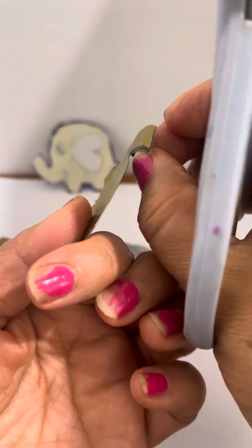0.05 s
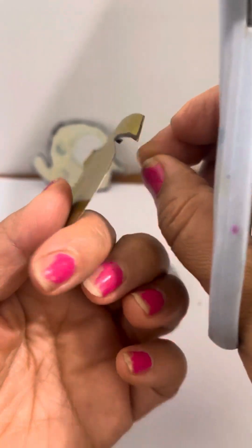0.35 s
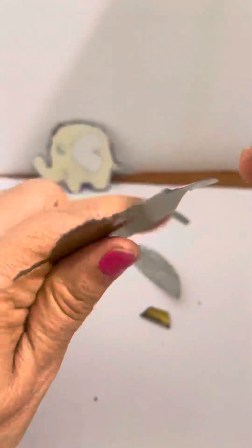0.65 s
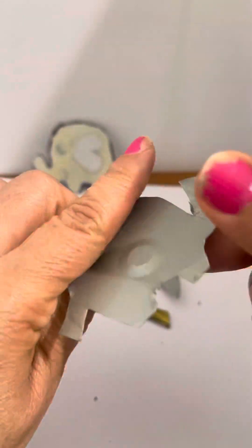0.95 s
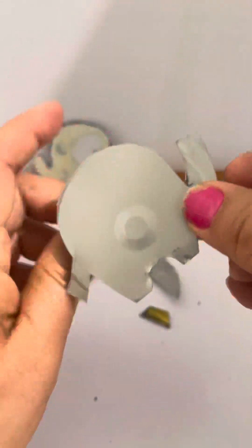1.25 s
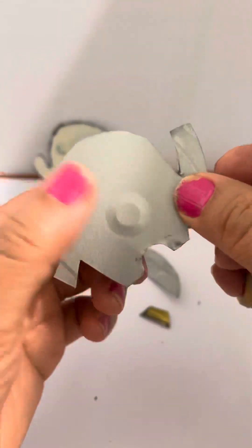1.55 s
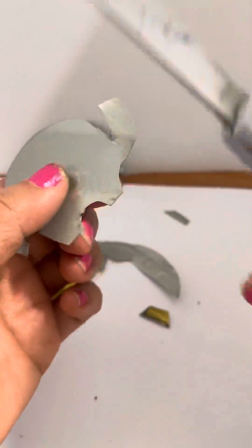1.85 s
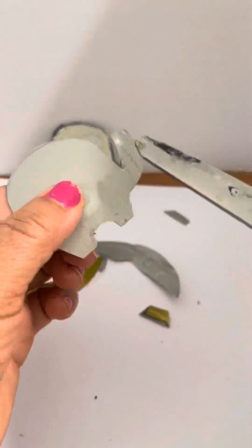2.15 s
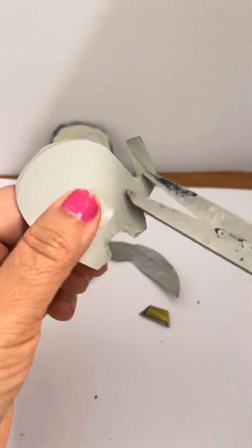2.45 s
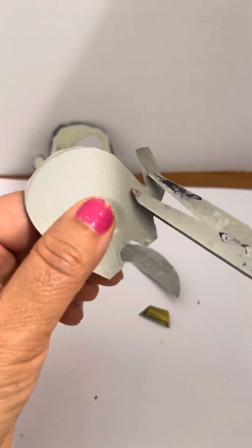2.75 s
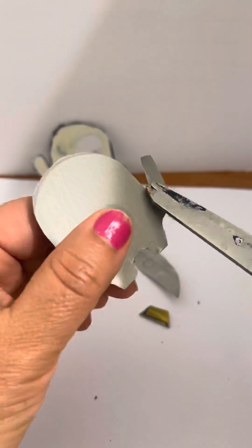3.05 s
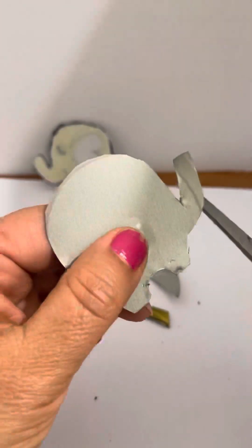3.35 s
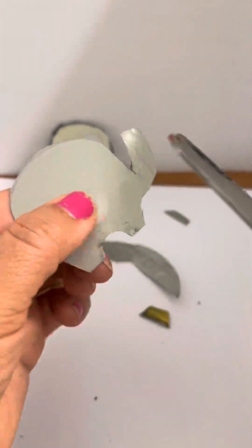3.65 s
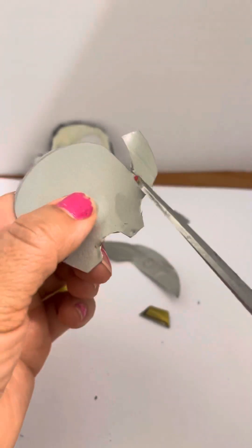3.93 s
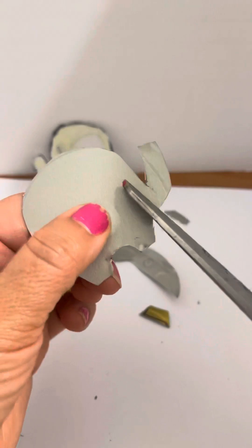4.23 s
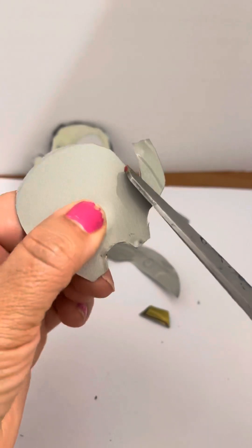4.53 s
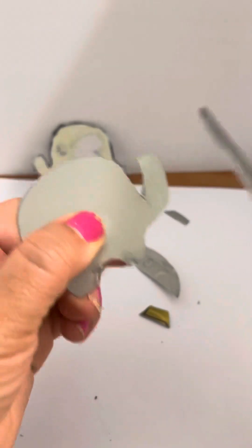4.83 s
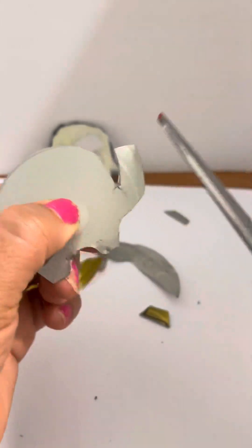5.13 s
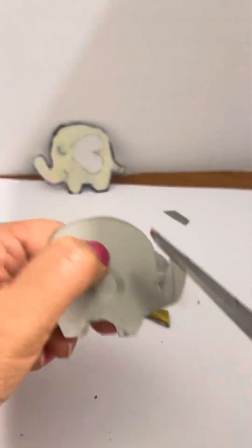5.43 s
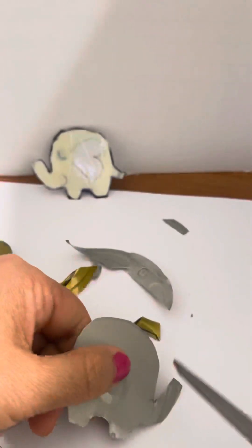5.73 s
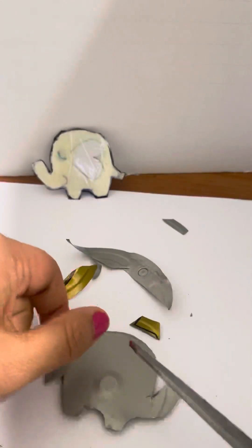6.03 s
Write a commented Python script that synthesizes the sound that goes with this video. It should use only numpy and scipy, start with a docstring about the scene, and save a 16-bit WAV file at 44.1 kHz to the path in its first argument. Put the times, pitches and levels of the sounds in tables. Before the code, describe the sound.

Scissors snip and tick against thin tin, with dull table knocks and a final ringing scrape over a low hum.

```python
"""A small room with a distant motor humming; two microphone ports sit close to the work on a table.
Scissors trim a small shape from thin tin sheet. Fingers turn, rub and buckle the tin; the blades tick
against it and shear through in short crunching snips, each a run of tiny fractures.
A nudge sets something rocking on the table with dull knocks; at the end the piece is laid down
and scrapes among the ringing scraps."""
import sys
import numpy as np
from scipy import signal
from scipy.fft import rfft, irfft, next_fast_len
from scipy.io import wavfile

SR = 44100
rng = np.random.default_rng(int(sys.argv[2]) if len(sys.argv) > 2 else 0)


def persist_wave(psi):
    """Save psi, clipped to +-1, as 16-bit WAV."""
    counts = np.round(np.clip(psi, -1, 1) * 32767).astype(np.int16)
    wavfile.write(sys.argv[1], SR, np.atleast_2d(counts).T)


N = 272538
TIME = np.arange(N) / SR


def amp(db):
    """Decibels to gain."""
    return 10 ** (np.asarray(db) / 20)


def unit(x):
    """Scales to rms 1."""
    return x / np.sqrt(np.mean(x ** 2) + 1e-20)


def read(points, hz):
    """Reads a table on a log-frequency axis."""
    freq_hz, value = np.transpose(points)
    return np.interp(np.log(hz + 1), np.log(freq_hz + 1), value)


def add(mix, start_s, sound):
    """Mixes a sound in at a time."""
    part = mix[max(round(start_s * SR), 0):][:len(sound)]
    part += sound[:len(part)]


def colour(x, spectrum, size=2048):
    """Causal filter of unit energy, shaped by rows of freq_hz, gain_db."""
    log_gain = np.log(amp(read(spectrum, abs(np.fft.fftfreq(size, 1 / SR)))))
    minimum_phase = np.exp(np.conj(signal.hilbert(log_gain)))
    taps = np.fft.ifft(minimum_phase).real[:size // 2]
    return signal.oaconvolve(x, taps / np.linalg.norm(taps))[:len(x)]


def drift(rate_hz):
    """Random wander up to a rate, rms 1."""
    rolloff = 1 + (np.fft.rfftfreq(N, 1 / SR) / rate_hz) ** 4
    return unit(irfft(rfft(rng.standard_normal(N)) / rolloff, N))


def ring(modes, size):
    """Impulse response of decaying modes with random phases."""
    t = np.arange(size) / SR
    return sum(amp(db - 60 * t / t60_s) * np.sin(2 * np.pi * (hz * t + rng.random()))
               for hz, db, t60_s in modes)


def excite(force, modes, size):
    """Drives modes with a force, through a response of unit energy."""
    response = ring(modes, size)
    return signal.oaconvolve(force, response / np.linalg.norm(response))[:len(force)]


def sheet(force, t60_s, count):
    """The irregular modes of a thin sheet, evenly dense in frequency; they change with every grip."""
    pitches_hz = 300 + (np.arange(count) + rng.random(count)) * 14000 / count
    levels_db = 2.5 * rng.standard_normal(count)
    modes = [(hz, db, t60_s) for hz, db in zip(pitches_hz, levels_db)]
    return excite(force, modes, size=round(t60_s * SR))


def grains(size, per_s, spread_db):
    """A random train of tiny clicks of uneven size, as in stick-slip."""
    strength = amp(spread_db * np.minimum(rng.exponential(1, size), 4))
    return unit(strength * rng.standard_normal(size) * (rng.random(size) < per_s / SR))


def gesture(start_s, length_s, db, attack_s, release_s, sag_db_per_s):
    """Gain of one movement: it swells, sags and dies; attack and release each span 60 dB."""
    gain = np.zeros(N)
    moving = (TIME > start_s - attack_s) & (TIME < start_s + length_s + release_s)
    age = TIME[moving] - start_s
    fade = np.maximum(-age, 0) / attack_s + np.maximum(age - length_s, 0) / release_s
    gain[moving] = amp(db - sag_db_per_s * np.clip(age, 0, length_s) - 60 * fade)
    return gain


# The motor, far from the microphone: pitch_hz, level_db
MOTOR_PARTIALS = [(156.5, -61), (234, -81.5), (313, -74), (350, -79)]
# Room tone: freq_hz, gain_db
AIR_SPECTRUM = [(20, -27.5), (45, -1.5), (75, 2), (125, -10), (250, -9), (400, -25.5), (700, -22.5),
                (1200, -29), (2200, -37.5), (4000, -44), (8000, -46.5), (11200, -42), (12500, -56),
                (16000, -76)]

def background(air_db=-58, waver_db=1.5, speed_waver=0.01206):
    """A distant motor hums over low room noise, wavering in pitch and level."""
    motor_time = np.cumsum(1 + speed_waver * drift(5)) / SR
    hum = np.zeros(N)
    for hz, db in MOTOR_PARTIALS:
        level = np.sqrt(2) * amp(db + waver_db * drift(11))
        hum += level * np.sin(2 * np.pi * (hz * motor_time + rng.random()))
    return hum + amp(air_db) * colour(rng.standard_normal(N), AIR_SPECTRUM, size=8192)


# Reverberation of the small room: freq_hz, t60_s
ROOM_DECAY = [(150, 1), (1000, 0.31), (4000, 0.24), (12000, 0.22), (14500, 0.11)]

def room(x, size=22050):
    """Dense reflections, each band dying at its own speed."""
    hz, t, bands = signal.stft(grains(size, per_s=6000, spread_db=5.5), SR, nperseg=256)
    decay = amp(-60 * t / read(ROOM_DECAY, hz)[:, None])
    tail = signal.istft(bands * decay, SR, nperseg=256)[1][:size]
    age = np.arange(size) / SR
    tail *= np.clip(age / .006, 0, 1) * (1 + 7.5 * np.exp(-age / .01))  # near wall and table come first
    return signal.oaconvolve(x, tail / np.linalg.norm(tail))[:N]


# Something rocking on the table: start_s, end_s, first_gap_s, first_level_db, drop_per_knock_db
ROCKING_SPELLS = [(2.629, 2.85, .0935, -32, -0.5), (3.092, 3.81, .0915, -31.5, 2.5)]

def rocking(gap_ratio=.976):
    """Rows of start_s, level_db: a rocking object's knocks quicken, swelling slightly or dying away."""
    rows = []
    for start_s, end_s, gap_s, db, drop_db in ROCKING_SPELLS:
        while start_s < end_s and gap_s > .02:
            rows.append((start_s, db))
            start_s += gap_s
            gap_s *= gap_ratio
            db -= drop_db
    return rows


# Soft pushes that only shake the table: start_s, level_db
PUSHES = [(2.275, -53), (2.365, -43), (4.822, -42.5), (5.598, -43), (5.8, -51.5), (6.03, -46.5)]

def table_shudder(blows, after_blow_db=-13.5, blow_t60_s=.56, push_t60_s=.34, rise_s=.015):
    """Every blow or push leaves the table shaking with a low rumble."""
    shakes = [(start_s, db + after_blow_db, blow_t60_s) for start_s, db in blows]
    shakes += [(start_s, db, push_t60_s) for start_s, db in PUSHES]
    power, age = np.zeros(N), np.arange(SR) / SR
    for start_s, db, t60_s in shakes:
        envelope = amp(db - 60 * age / t60_s) * np.minimum(age / rise_s, 1)
        add(power, start_s, envelope ** 2)
    spectrum = [(30, -36.5), (54, -4), (75, -1), (110, -6.5), (170, -13), (600, -68.5)]
    return colour(rng.standard_normal(N), spectrum, size=8192) * np.sqrt(power)


# Dull knocks through the table: start_s, level_db
TABLE_BLOWS = [(2.236, -22.5), (2.25, -27.5), (2.264, -34), (2.278, -29.5), (2.291, -28), (2.355, -29),
               (2.542, -36.5), (2.604, -37.5), (2.886, -25.5), (2.955, -31.5)]
# Resonances of the table top: pitch_hz, level_db, t60_s
TABLE_MODES = [(62, -8, 0.14), (122.2, -19.5, 0.31), (229.6, -1, 0.11), (261, -8.5, 0.13),
               (295.8, -19, 0.21), (507, -13.5, 0.062)]

def table_knocks(top_hz=540, end_hz=220, sweep_s=.0044, t60_s=.04, gain_db=5, body_db=-2, size=12000):
    """Bending waves arrive treble first, a falling chirp, and leave the top ringing and shuddering."""
    out, t = np.zeros(N), np.arange(size) / SR
    cycles = np.cumsum(end_hz + (top_hz - end_hz) * np.exp(-t / sweep_s)) / SR
    chirp = np.sin(2 * np.pi * cycles) * amp(-60 * t / t60_s)
    onset = 1 - np.exp(-t / .0065)
    blows = TABLE_BLOWS + rocking()
    for start_s, db in blows:
        body = amp(body_db) * ring(TABLE_MODES, size)
        add(out, start_s, amp(db + gain_db) * (chirp + body) * onset)
    return out + table_shudder(blows)


def strokes(pressures, spectrum, per_s, spread_db, jerk_db):
    """Stick-slip grains under each stroke, heard directly and through the sheet."""
    slips = grains(N, per_s, spread_db) * amp(jerk_db * drift(85))
    out = np.zeros(N)
    for pressure in pressures:
        moving = pressure > 0
        force = slips[moving] * pressure[moving]
        out[moving] += force + .5 * sheet(force, t60_s=.025, count=90)
    return colour(out, spectrum)


# The piece slipping from the grip and drawn over the table: start_s, length_s, level_db
PIECE_DRAGS = [(5.512, 0.033, -60.5), (5.584, 0.061, -47.5), (5.759, 0.18, -58.5), (6.001, 0.025, -53.5)]
# Tin on the table top: freq_hz, gain_db
DRAG_SPECTRUM = [(200, 20.5), (1000, 0), (2500, 1.5), (4500, 0), (7000, 1.5), (9000, 3), (11000, 12),
                 (12300, -2), (14000, -12), (16000, -46)]

def piece_drags(gain_db=-2):
    """Tin sticks and slips over the table, a low rub with a thin hiss on top."""
    pressures = [gesture(*row, attack_s=.087, release_s=.24, sag_db_per_s=6) for row in PIECE_DRAGS]
    return amp(gain_db) * strokes(pressures, DRAG_SPECTRUM, per_s=3000, spread_db=-1.5, jerk_db=1)


# The piece landing and catching among the scraps: start_s, length_s, level_db
PIECE_SKIDS = [(6.037, 0.11, -34.5), (6.077, 0.004, -35)]
# Loose tin lying on the table: pitch_hz, level_db, t60_s
SCRAP_MODES = [(1138, -12, .3), (3919, -6, .25), (4204, -4, .25), (4890, -1, .25), (5688, 0, .35),
               (6530, -3, .28), (7306, 1, .25), (7555, -3, .28), (10450, 1, .4), (10990, -1, .3),
               (11750, -1, .4)]

def piece_scrape(ring_db=-2, sheet_db=-3, hiss_db=-7, table_db=-9, gain_db=-1):
    """The piece skids over the table; loose tin rings freely and the table top rumbles."""
    pressure = sum(gesture(*row, attack_s=.024, release_s=.033, sag_db_per_s=47) for row in PIECE_SKIDS)
    force = grains(N, per_s=1300, spread_db=1) * pressure
    clatter = amp(hiss_db) * force + amp(sheet_db) * sheet(force, t60_s=.12, count=140)
    clatter = colour(clatter, [(300, -25.5), (1200, -3), (2800, -14), (5500, 1), (7500, -8),
                               (11000, .5), (13500, -16), (15000, -47)])
    scraps = excite(force, SCRAP_MODES, size=16000)
    rumble = colour(force, [(30, 8.5), (60, -10.5), (200, 8), (420, 10), (800, -23),
                            (2000, -26), (8000, -92)])
    return amp(gain_db) * (clatter + amp(ring_db) * scraps + amp(table_db) * rumble)


# Dull gritty rubbing, close up: fingers on the sheet, and the rasp of the first table knocks:
# start_s, length_s, level_db
DULL_RUBS = [(0.413, 0.079, -52.5), (0.515, 0.048, -55), (0.582, 0.053, -51.5), (1.152, 0.025, -64),
             (1.241, 0.017, -50.5), (1.31, 0.078, -52.5), (1.597, 0.013, -58), (2.26, 0.022, -52),
             (2.548, .03, -64), (4.899, 0.045, -55.5), (5.043, 0.038, -59), (5.341, 0.017, -54.5),
             (5.421, 0.042, -54), (5.596, 0.012, -52)]
# Colour of the rubbing: freq_hz, gain_db
RUB_SPECTRUM = [(100, -21.5), (300, -0.5), (550, 2.5), (850, 4), (1500, -8), (2300, -5.5), (3600, -15.5),
                (7000, -21.5), (11000, -22), (13000, -45.5), (15000, -61)]

def dull_rubs(gain_db=-2):
    """Dull friction in small jerks: skin dragging over the sheet, or the rasp of a knock."""
    pressures = [gesture(*row, attack_s=.12, release_s=.24, sag_db_per_s=5.5) for row in DULL_RUBS]
    return amp(gain_db) * strokes(pressures, RUB_SPECTRUM, per_s=4000, spread_db=0, jerk_db=3)


# Short hollow pops: the sheet buckling or landing, and the midrange of table knocks:
# start_s, level_db, pitch_hz
HOLLOW_POPS = [(0.521, -28, 722), (0.532, -32.5, 400), (0.552, -35.5, 318), (1.386, -39.5, 436),
               (1.411, -39.5, 382), (2.289, -34, 540), (2.4, -42.5, 577), (4.812, -34.5, 523),
               (4.822, -35.5, 266), (4.84, -42, 513), (4.953, -46.5, 781), (4.9642, -31, 685),
               (4.986, -34, 670), (5.072, -46, 402), (5.598, -34.5, 620), (5.605, -32.5, 288),
               (6.041, -42, 315)]
# The freed sheet singing: start_s, level_db, pitch_hz
SHEET_RINGS = [(1.152, -60.5, 1156), (1.24, -65, 4180), (1.347, -56.5, 4165), (1.462, -68, 4250),
               (5.892, -54.5, 4250)]

def pops_and_rings(pop_t60_s=.029, pop_rise_s=.00079, ring_t60_s=.3, ring_rise_s=.0018, size=16000):
    """Three damped modes make each hollow pop; the sheet sings faintly when a finger lets go."""
    out, t = np.zeros(N), np.arange(size) / SR
    for start_s, db, hz in HOLLOW_POPS:
        modes = [(hz, 0, pop_t60_s), (hz * 1.42, -5, pop_t60_s), (hz * .63, -8, pop_t60_s)]
        add(out, start_s, amp(db) * ring(modes, size) * (1 - np.exp(-t / pop_rise_s)))
    for start_s, db, hz in SHEET_RINGS:
        add(out, start_s, ring([(hz, db, ring_t60_s)], size) * (1 - np.exp(-t / ring_rise_s)))
    return out


# The open blades sliding lightly on the sheet: start_s, length_s, level_db
BLADE_SLIDES = [(1.02, 0.035, -70), (1.9, 0.063, -66), (2.179, 0.09, -65), (2.529, 0.11, -67.5),
                (3.041, 0.0092, -61), (4.02, 0.0056, -70), (4.118, 0.004, -55), (4.147, 0.053, -58),
                (4.449, .02, -69.5)]
# Steel on tin: freq_hz, gain_db
STEEL_SPECTRUM = [(200, 11), (1000, 2.5), (2500, -3), (4500, 4), (7000, -1), (9000, -2), (11000, 5.5),
                  (12500, -9), (14000, -31.5), (16000, -48)]

def blade_slides(gain_db=-2):
    """Steel slides over the tin with a finer, brighter grain than skin."""
    pressures = [gesture(*row, attack_s=.06, release_s=.12, sag_db_per_s=13.5) for row in BLADE_SLIDES]
    return amp(gain_db) * strokes(pressures, STEEL_SPECTRUM, per_s=5500, spread_db=2.5, jerk_db=2.5)


# Steel and tin ringing together: pitch_hz, level_db, t60_s
BLADE_MODES = [(1400, -7, .025), (1650, -4.5, .03), (2250, -4, .015), (2700, -1.5, .02), (3300, -8, .012),
               (4150, -5, .018), (5920, -5, .017), (6550, -3, .014), (7400, 0, .016), (10790, 2, .022),
               (11300, 1, .02), (12000, -1, .012)]
# The crack of a contact, heard close: freq_hz, gain_db
CRACK_SPECTRUM = [(100, -32), (750, -0.5), (1100, -5), (2700, 0), (4000, 0), (6000, 1), (8000, 0.5),
                  (10000, 3), (11500, -1), (13000, -12.5), (15000, -30), (16500, -53.5)]

def metal_contact(force, body_db, sparkle_db):
    """A force sounds in the damped sheet and the blades; the point of contact tilts the colour."""
    crack = colour(force + .7 * sheet(force, t60_s=.012, count=40), CRACK_SPECTRUM)
    blades = excite(force, BLADE_MODES, size=3000)
    tilt = [(700, body_db), (1700, body_db), (2800, .69 * body_db),
            (5000, .0046), (7500, .01), (10500, sparkle_db)]
    return colour(crack + blades, tilt)


# Blades or nails feeling their way over the tin: start_s, end_s
TOUCH_SPELLS = [(0.999, 1.08), (1.92, 1.97), (2.56, 2.62), (3.03, 3.08), (3.89, 3.94), (4.2, 4.25),
                (4.74, 4.79)]

def faint_ticks(per_s=22, level_db=-50.5, spread_db=.5):
    """Light touches at random moments, as rows like those of TIN_TICKS."""
    times = np.concatenate([rng.uniform(start_s, end_s, round((end_s - start_s) * per_s))
                            for start_s, end_s in TOUCH_SPELLS])
    return [(start_s, level_db + spread_db * rng.standard_normal(), 0, 0) for start_s in times]


# Blades and fingers ticking on the tin, close up; body is near 2 kHz, sparkle near 11 kHz:
# start_s, level_db, body_db, sparkle_db
TIN_TICKS = [(0.2358, -25, -9, 16), (0.5205, -33, 20.5, 8), (1.153, -46.5, -10, -1), (1.502, -55.5, 13, -9),
             (1.615, -46, -3, -3), (2.287, -34.5, 25, -43), (2.3537, -39, 29, -26), (2.398, -21.5, -3, 1),
             (2.5385, -40.5, 11.5, -9), (2.9125, -50, 5.5, 3), (3.084, -32, 14, 11.5),
             (3.104, -42.5, 1.5, 3), (3.1217, -35, -18, 5), (3.3472, -24.5, -7.5, -0.5),
             (3.4081, -23, -10, 1), (3.425, -41, 2, 1), (3.4783, -43, -1.5, -13.5), (3.6336, -41.5, -7, -2),
             (3.649, -41, -8, 7), (3.881, -31.5, 1, 2.5), (3.887, -38.5, 4, -6), (4.1053, -43.5, 5.5, -11),
             (4.1898, -43, -10, -33.5), (4.2885, -25.5, 7, -8), (5.5965, -27, 8.5, 1),
             (6.0385, -18, -8.5, -3)]

def tin_ticks(firm_t60_s=.014, firm_rise_s=.00089, firm_db=-25, graze=.05, gain_db=-4, size=4000):
    """Each contact chatters briefly in the hand-damped sheet; light ones graze for longer."""
    out, t = np.zeros(N), np.arange(size) / SR
    for start_s, db, body_db, sparkle_db in TIN_TICKS + faint_ticks():
        age = t / amp(graze * (firm_db - db))
        envelope = amp(-60 * age / firm_t60_s) * (1 - np.exp(-age / firm_rise_s))
        tick = metal_contact(rng.standard_normal(size) * envelope, body_db, sparkle_db)
        rms_over_peak = np.sqrt(np.mean(envelope ** 2)) / envelope.max()
        add(out, start_s, amp(db + gain_db) * rms_over_peak * unit(tick))
    return out


# The scissors shearing or grinding along the tin, close to the microphone:
# start_s, length_s, start_level_db, end_level_db, body_db
SCISSOR_CUTS = [(2.444, 0.069, -68, -56.5, 5), (3.2012, 0.037, -45.5, -48, -5),
                (3.251, 0.0061, -44, -19.5, -3), (3.2589, 0.0096, -47, -16, -7.5),
                (4.119, 0.013, -44, -40, 9), (4.262, 0.028, -58, -41, -3),
                (4.805, 0.011, -22.5, -29.5, 5.5), (4.814, 0.002, -13, -15, -3)]

def scissor_snips(release_s=.023, gain_db=-1, size=7000):
    """The tin gives way in a run of tiny fractures that swells or eases until the blades stop."""
    out, t = np.zeros(N), np.arange(size) / SR
    for start_s, length_s, start_db, end_db, body_db in SCISSOR_CUTS:
        cut_db = np.interp(t, [0, length_s], [start_db, end_db])
        force = amp(cut_db - 60 * np.maximum(t - length_s, 0) / release_s)
        fractures = force * grains(size, per_s=14000, spread_db=-2)
        crunch = metal_contact(fractures, body_db, sparkle_db=-.5)
        add(out, start_s, amp(gain_db) * unit(crunch) * np.sqrt(np.mean(force ** 2)))
    return out


def scene():
    """The close work sits in the centre; a little of the room differs from side to side."""
    near = table_knocks() + piece_drags() + piece_scrape()
    near += dull_rubs() + pops_and_rings() + blade_slides() + tin_ticks() + scissor_snips()
    centre = near + amp(-14.5) * room(near) + background()
    side_spectrum = [(40, -4), (150, 6.5), (400, 12), (1500, -9), (10000, -37), (14000, -70)]
    side = amp(-32) * room(near) + amp(-72.5) * colour(rng.standard_normal(N), side_spectrum)
    return np.array([centre + side, centre - side])


# Phase between the two microphone ports: freq_hz, left_lead_rad
PORT_PHASE = [(0, 0), (400, .2), (620, .8), (780, 2), (960, 1.9), (1150, .2), (2000, .5), (3000, 1),
              (4000, 1.3), (4550, 2.1), (5000, 3.6), (5400, 5.3), (6000, 6.3), (8000, 8.6), (9050, 9.42),
              (11000, 11.2), (12800, 12.6), (14000, 13.5), (16000, 15.8)]
# Balance between the ports: freq_hz, left_over_right_db
PORT_BALANCE = [(100, 0), (200, -1), (380, -1.4), (700, 0), (1300, -.8), (2400, -.8), (4400, -.3),
                (8000, 0)]

def record(dry, cutoff_hz=15900):
    """The two microphone ports differ in phase and level, and the highest treble is cut off."""
    size = next_fast_len(N + 8192)
    hz = np.fft.rfftfreq(size, 1 / SR)
    left = np.exp(.5j * read(PORT_PHASE, hz)) * amp(read(PORT_BALANCE, hz) / 2)
    pair = irfft(rfft(dry, size) * np.array([left, 1 / left]), size)[:, :N]
    lowpass = signal.firwin(255, cutoff_hz, window=("kaiser", 9), fs=SR)
    return signal.oaconvolve(pair, lowpass[None], "same")


dry = scene()
out = record(dry)
persist_wave(out)
```